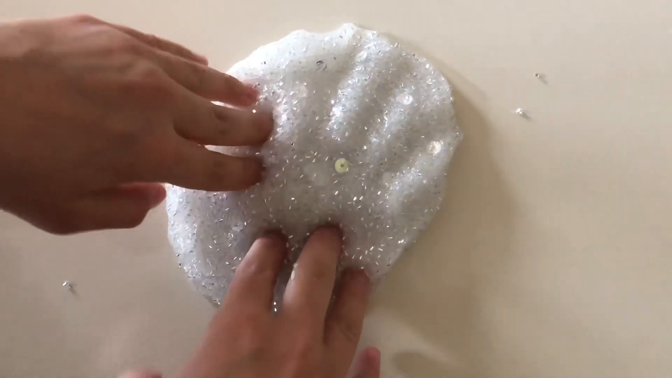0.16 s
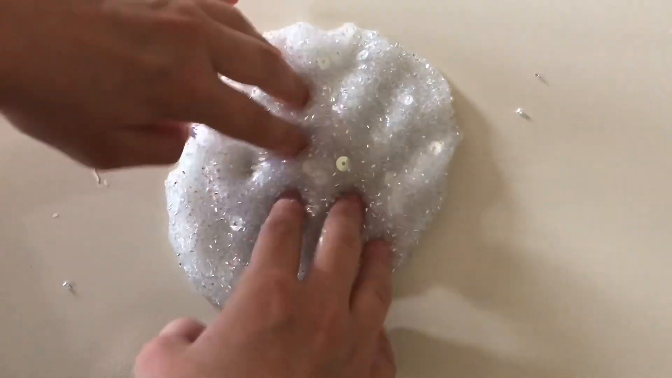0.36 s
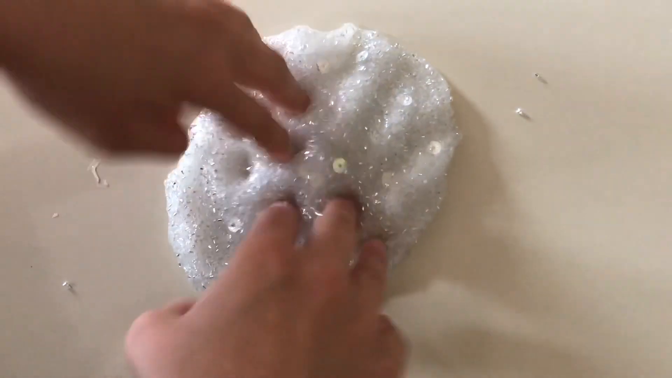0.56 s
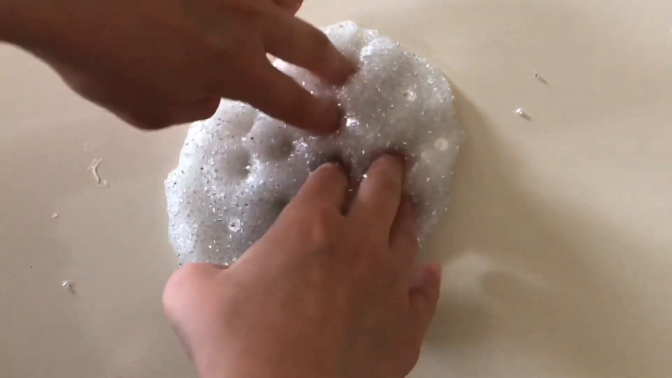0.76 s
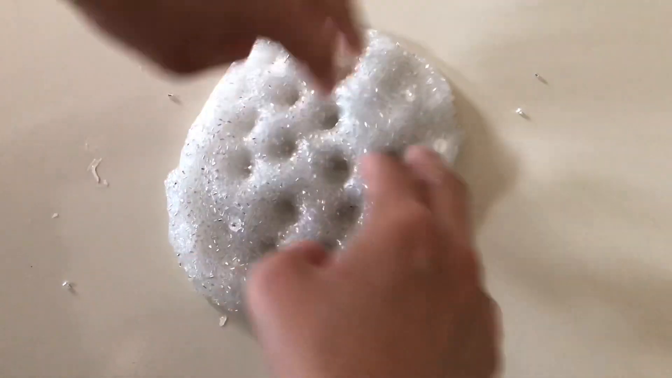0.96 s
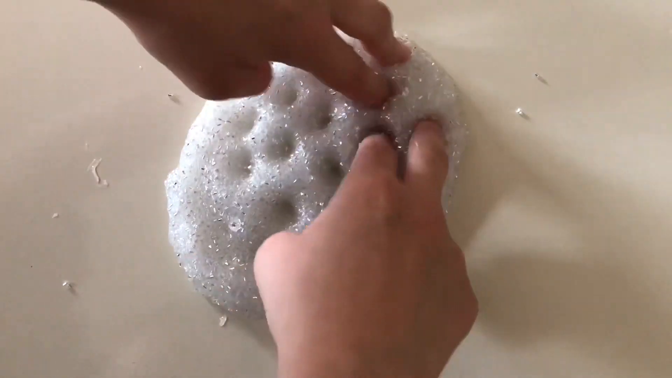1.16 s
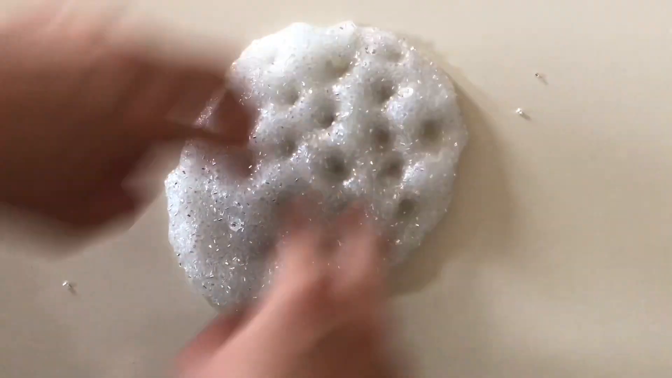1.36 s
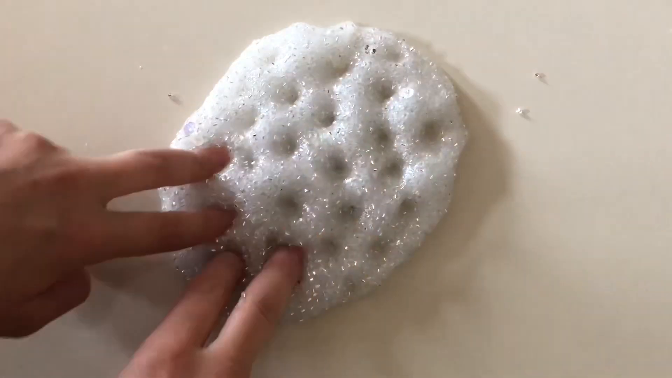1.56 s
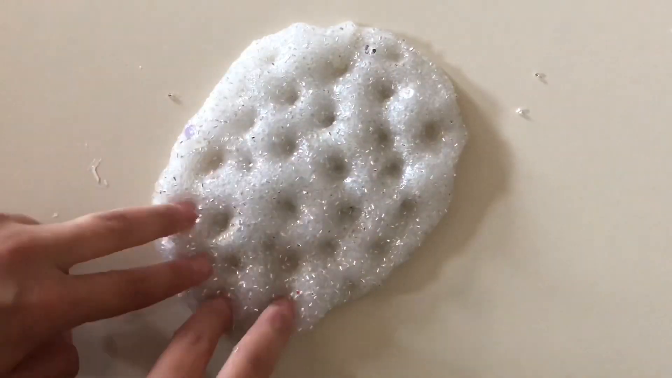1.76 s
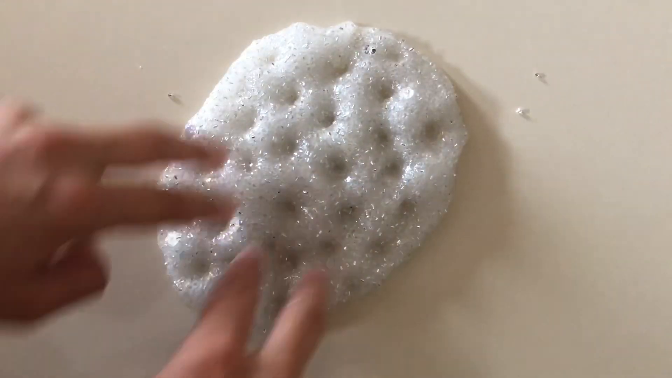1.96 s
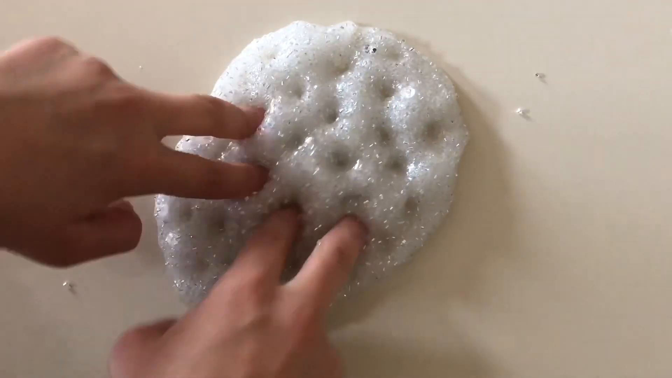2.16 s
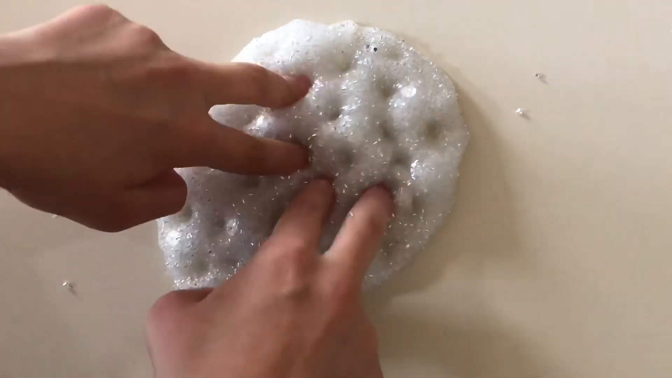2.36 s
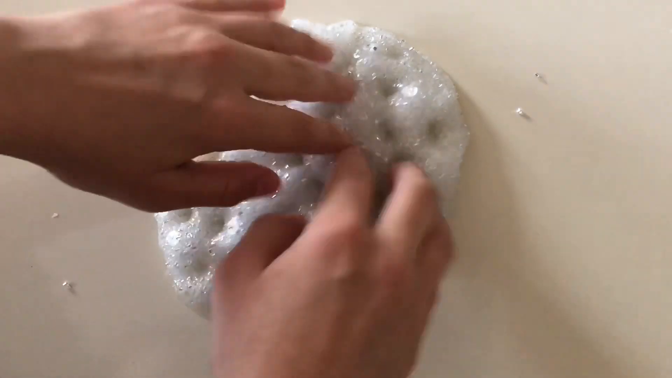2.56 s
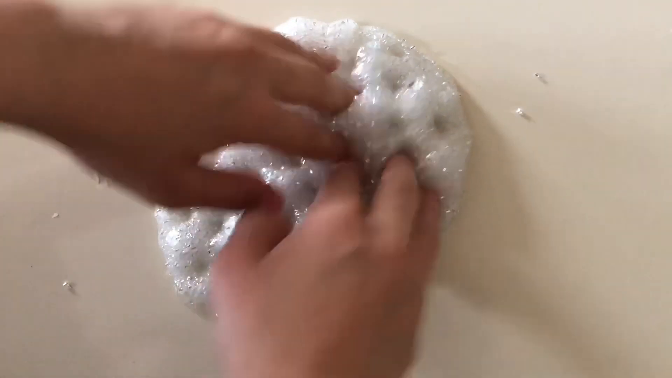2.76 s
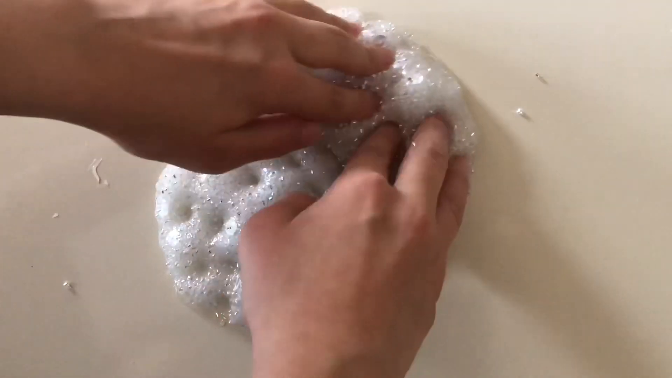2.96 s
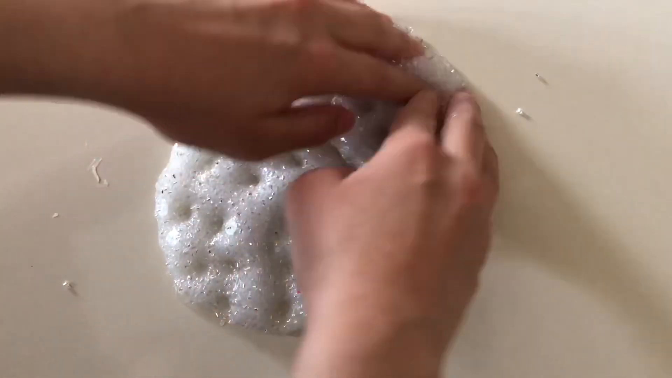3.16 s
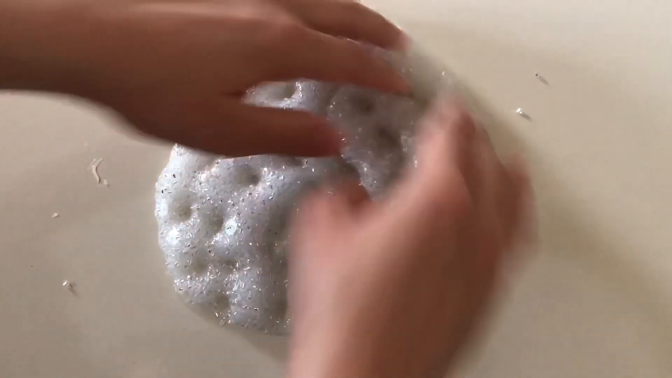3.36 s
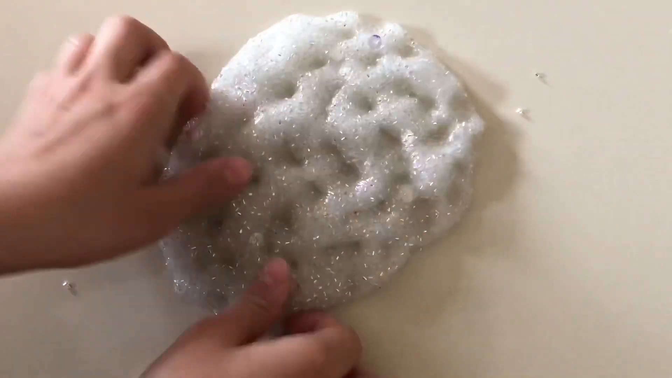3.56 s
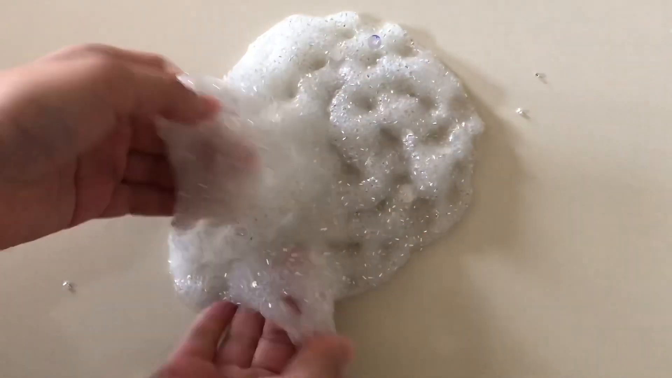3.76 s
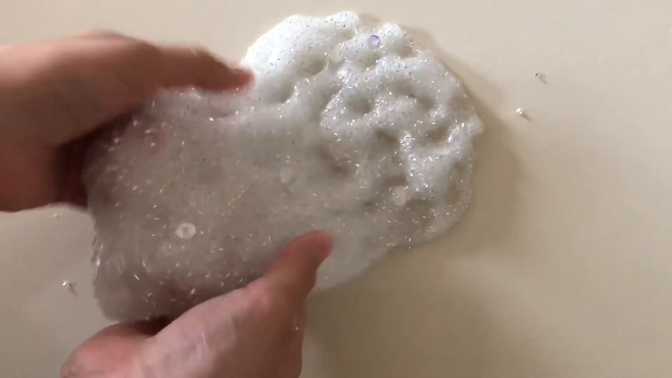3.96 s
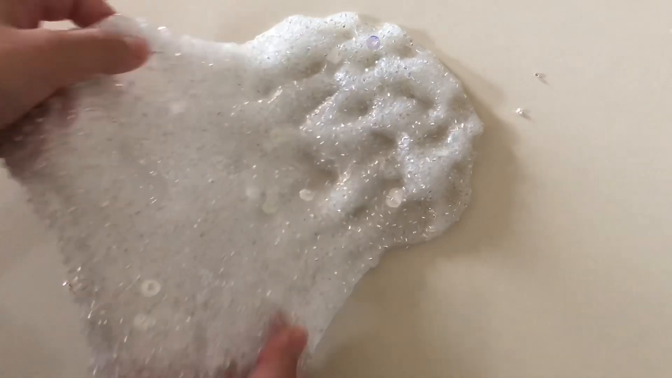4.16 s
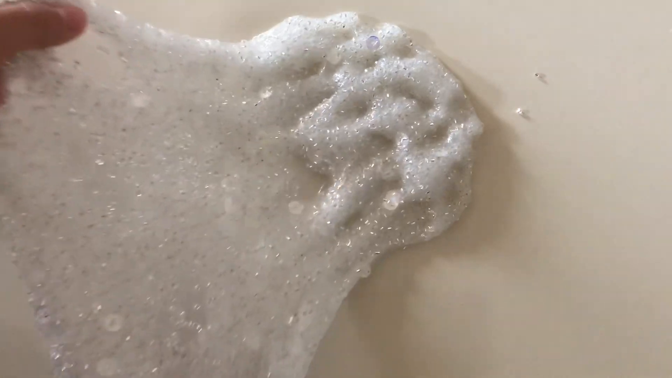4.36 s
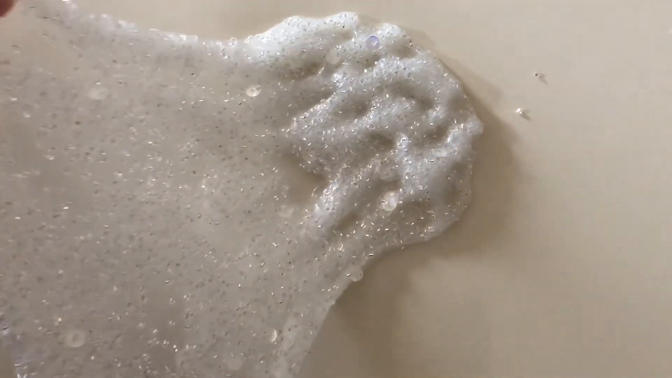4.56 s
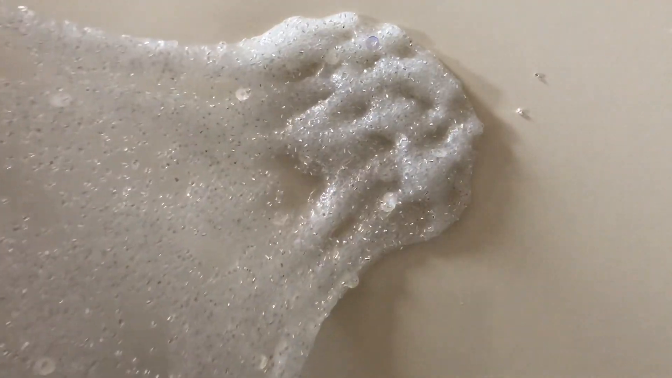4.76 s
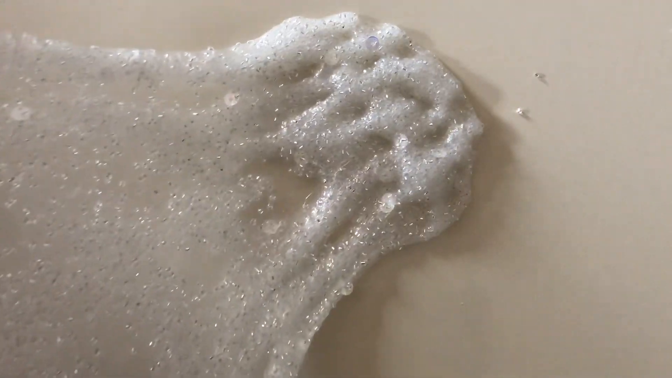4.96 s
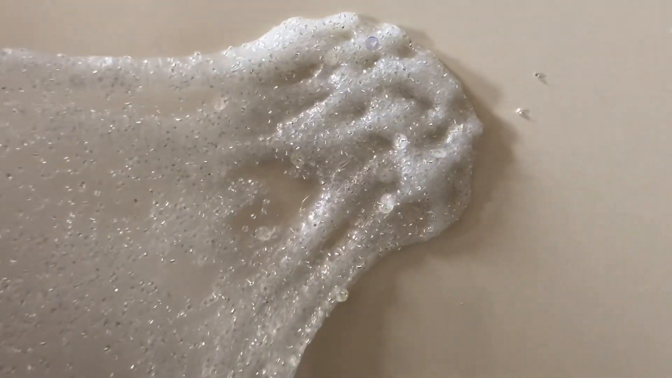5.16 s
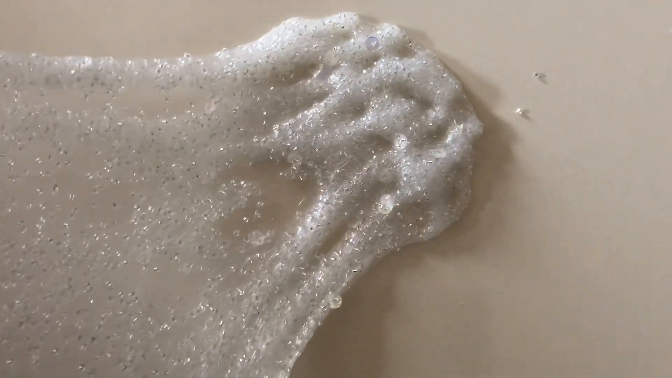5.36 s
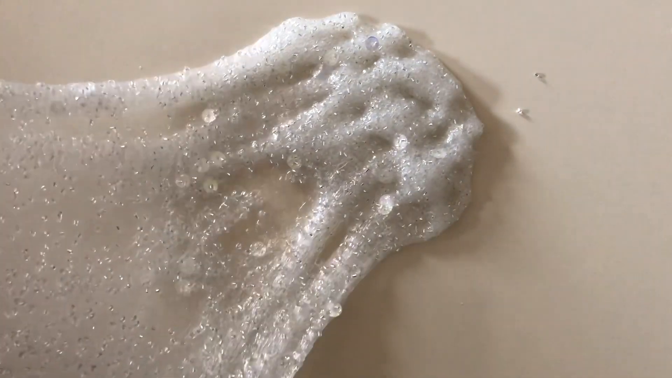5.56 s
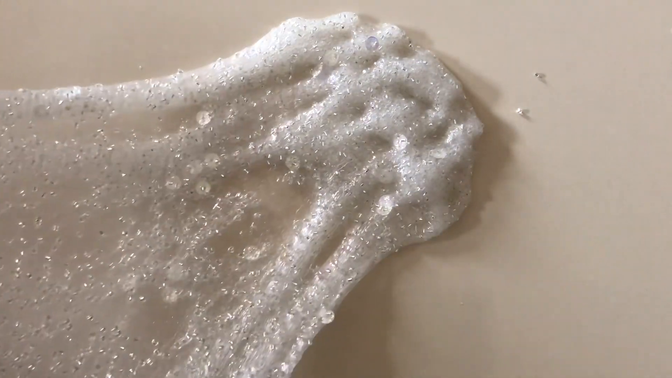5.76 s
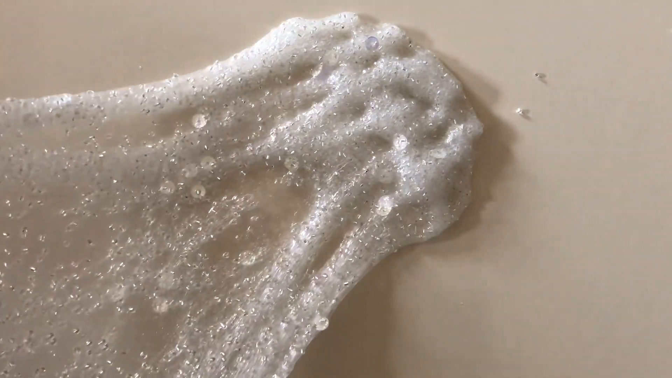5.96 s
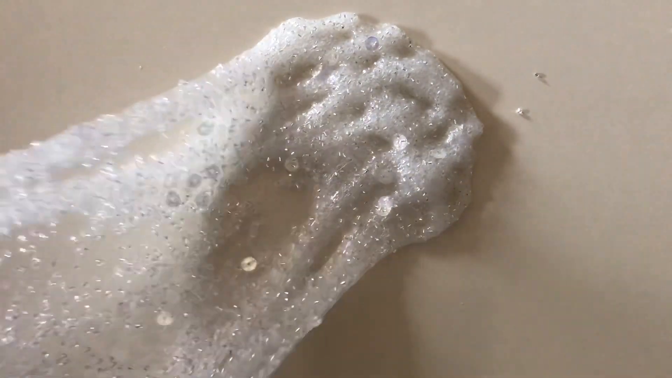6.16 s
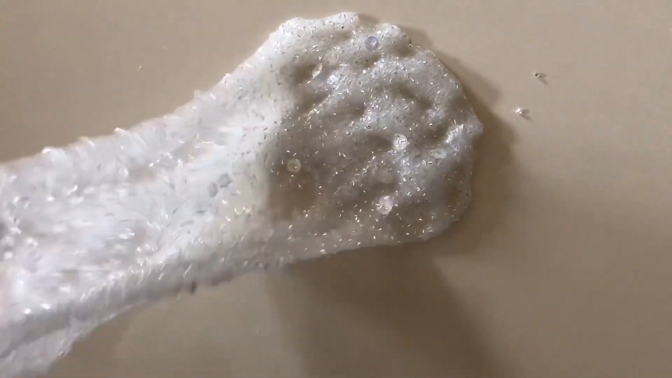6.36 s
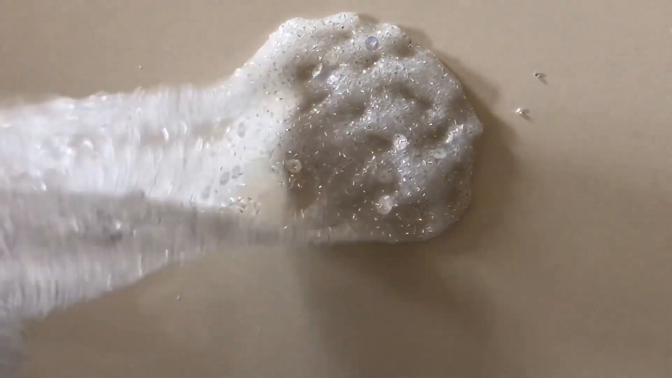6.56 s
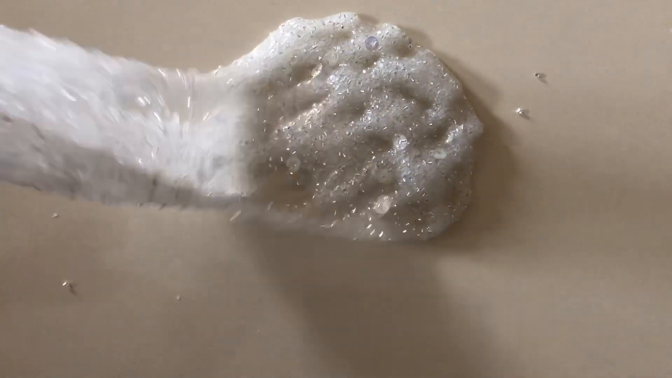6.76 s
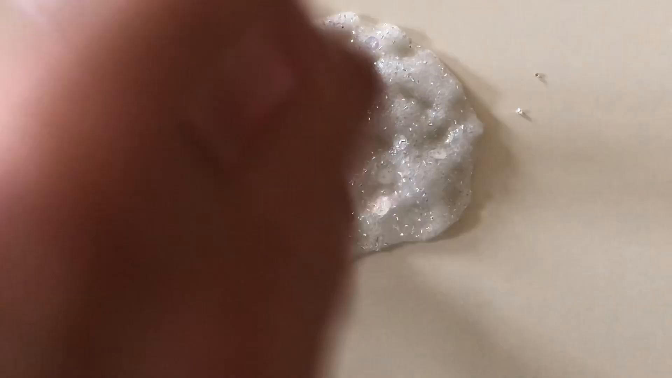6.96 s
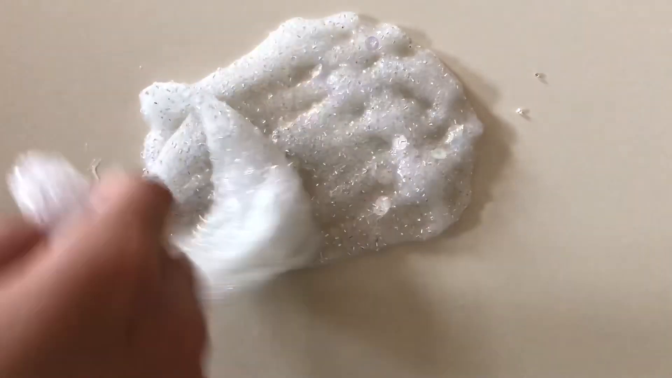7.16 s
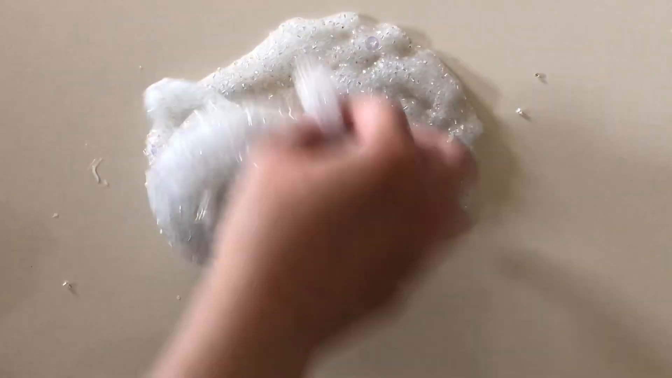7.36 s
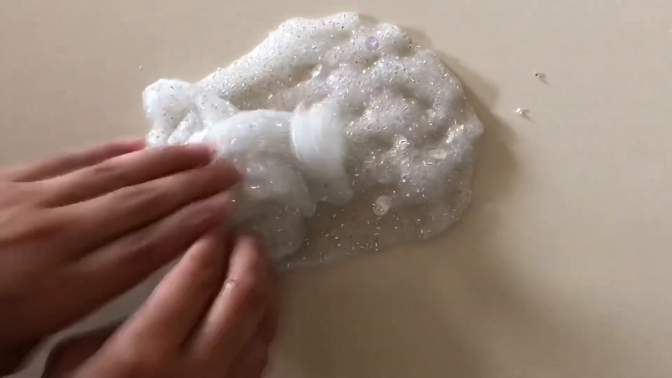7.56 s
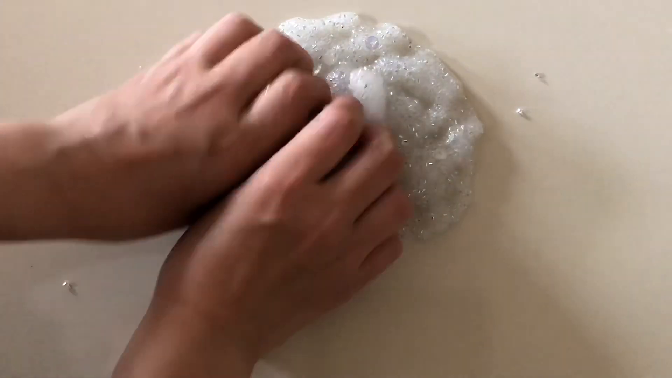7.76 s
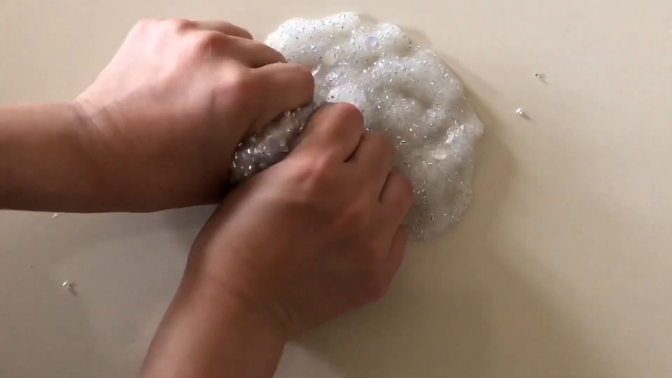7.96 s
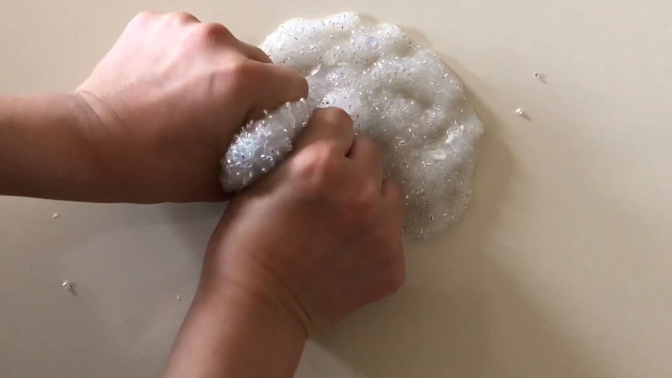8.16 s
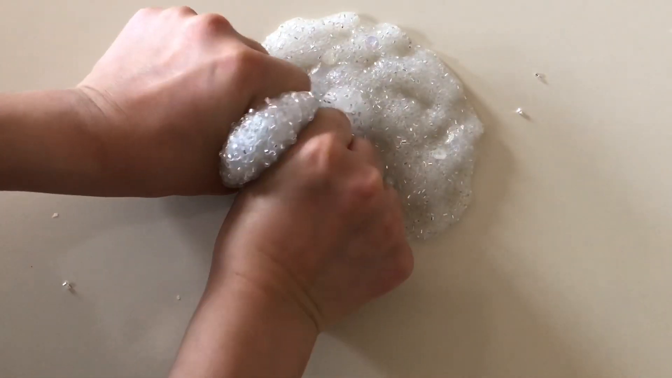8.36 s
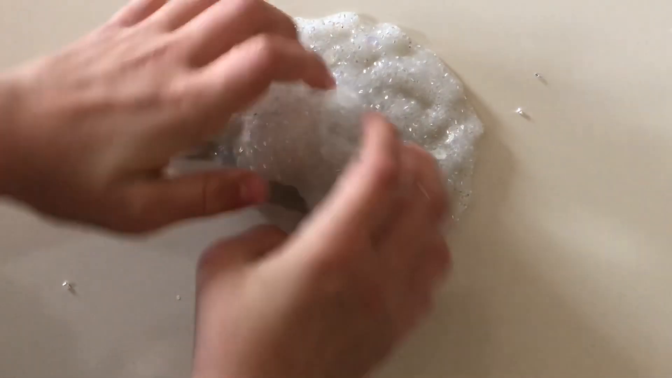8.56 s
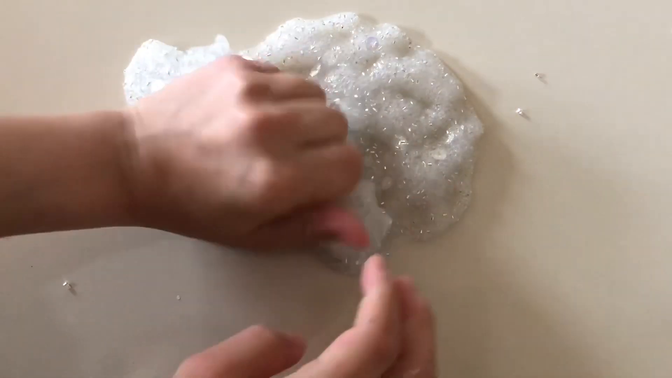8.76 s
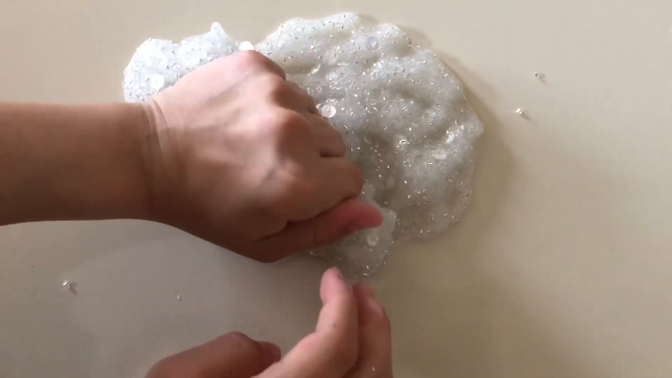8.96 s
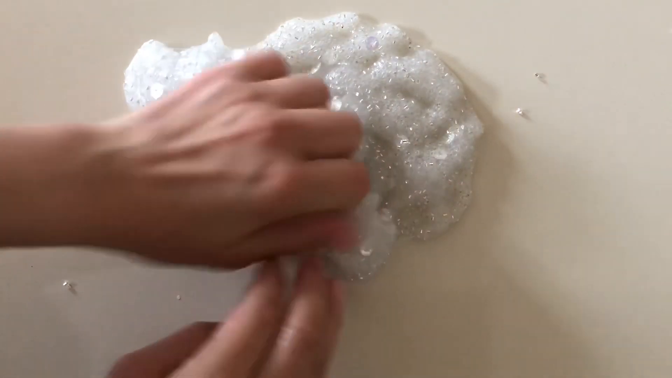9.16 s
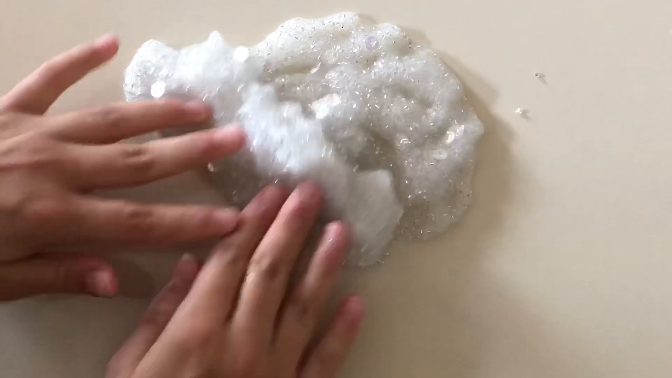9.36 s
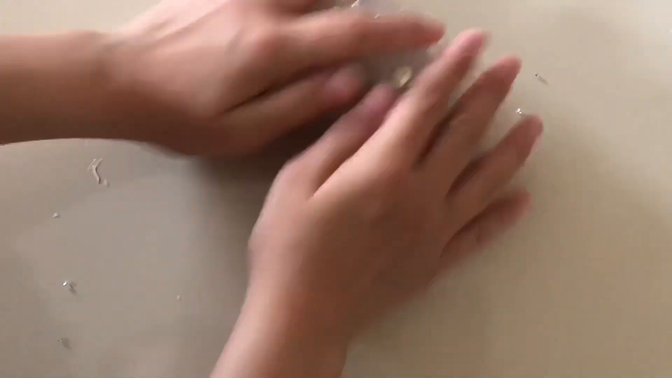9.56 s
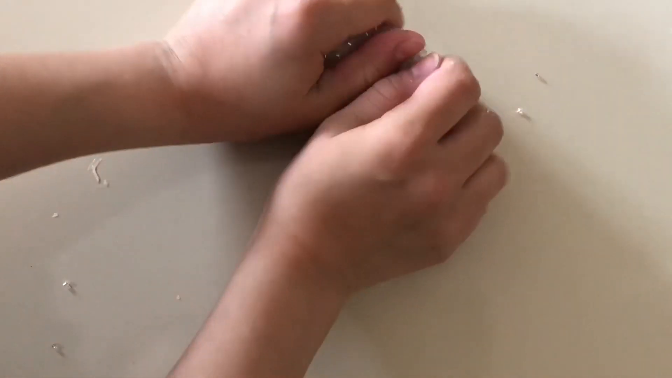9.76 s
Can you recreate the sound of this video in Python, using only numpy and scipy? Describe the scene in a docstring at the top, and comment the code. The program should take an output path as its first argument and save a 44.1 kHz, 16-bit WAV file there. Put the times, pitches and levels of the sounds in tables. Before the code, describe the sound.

Fingers poke a slab of bead-filled slime on a wooden table, each push giving a soft thump, a crunch and a small sticky click. The slime is then stretched with a faint fizz that almost dies away. Finally it is folded and squeezed, bursting into loud snaps, wet plops and crackling squelches. The microphone is close, in a quiet room with a low hum.

```python
"""Playing with bead slime

Fingers poke, stretch, fold and squeeze a slab of slime full of small beads on a wooden table.
Each poke thumps the table and crunches the beads. Trapped air pockets snap, hollows collapse with
a plop, sticky threads click as they break, and the moving slime fizzes and crackles.
The room hums quietly below, and a far motor rises in pitch for a moment."""
import sys
import numpy as np
from scipy import signal
from scipy.fft import rfft, irfft, next_fast_len
from scipy.io import wavfile

SR = 44100
rng = np.random.default_rng(int(sys.argv[2]) if len(sys.argv) > 2 else 0)


def materialize(psi):
    """Save the field psi as 16-bit PCM at rate SR to the path in sys.argv[1].

    A 1-D psi becomes a single channel; in a 2-D psi each row is a channel.
    """
    bounded = np.clip(np.atleast_2d(psi).T, -1, 1)
    quanta = np.round(bounded * 32767).astype(np.int16)
    wavfile.write(sys.argv[1], SR, quanta)


N = 433503

# Hollows in the slime collapsing. Each row: start in seconds, level in dB, starting pitch in Hz.
COLLAPSES = [(0.389, -30, 720), (0.528, -28, 2030), (0.658, -27, 2330), (1.003, -25, 1070),
             (1.0143, -22, 2320), (1.53, -27, 2500), (1.9905, -23, 2270), (3.145, -30.5, 213),
             (3.538, -28.5, 540), (3.553, -26.5, 310), (3.85, -32.5, 480), (7.733, -28, 2640),
             (7.804, -34, 1590), (7.8706, -17.5, 3000), (7.884, -21, 1800), (7.903, -5.5, 2110),
             (7.9714, -12, 3460), (8.001, -17.5, 1120), (8.015, -19, 1130), (8.089, -25.5, 1000),
             (8.155, -21.5, 1470), (8.3457, -21, 2400), (8.5655, -22, 2080), (8.579, -18.5, 2440),
             (8.856, -26, 2280), (8.884, -22.5, 2030), (8.931, -22, 2020), (8.9478, -16.5, 2210)]


def finger_pokes(rise_s, fall_s, push_s):
    """Beads crunch as a finger sinks in; the push rings the table and the hole left in the slime."""
    # Each row: start in seconds, thump level in dB, crunch level in dB, pitch of the hole in Hz.
    pokes = [(0.132, -23.5, -32, 1560), (0.272, -20, -26.5, 1800), (0.388, -27.5, -41, 1390),
             (0.539, -34.5, -45, 1850), (0.639, -22, -25.5, 1830), (1.005, -21.5, -23.5, 1490),
             (1.358, -23.5, -23.5, 1530), (1.713, -24, -29.5, 760), (1.99, -60, -26, 2060),
             (2.181, -33.5, -37, 1400), (2.27, -23.5, -29, 710), (2.538, -23, -25.5, 740),
             (2.853, -26.5, -23, 1040), (2.941, -27, -30, 890), (3.136, -30, -25, 813),
             (3.41, -27, -30, 556), (3.549, -25.5, -41.5, 1280)]
    # The notes the wooden table rings at. Each row: pitch in Hz, level in dB, seconds to fade by 60 dB.
    wood_notes = [(160, -9, 0.09), (335, 3, 0.075), (487.6, -3, 0.04), (695, -3, 0.03)]
    lag_cycles = 1.346   # deeper notes answer later
    crunch, knocks = np.zeros(N), np.zeros(N)
    t = np.arange(8000) / SR
    lead_s = 3 * rise_s
    swell = np.where(t < lead_s, np.exp((t - lead_s) / rise_s), np.exp(-(t - lead_s) / fall_s))
    pushes = rng.standard_normal((len(pokes), len(t))) * np.exp(-t / push_s) * (1 - np.exp(-t / 0.000053))
    # The hands and the slab shift the table's notes a little on every poke.
    note_gains = from_db(2.5 * rng.standard_normal((len(pokes), len(wood_notes))))
    note_tunings = np.exp(0.025 * rng.standard_normal(note_gains.shape))
    for poke, push, gains, tunings in zip(pokes, pushes, note_gains, note_tunings):
        start, thump_db, crunch_db, hole_hz = poke
        add(crunch, from_db(crunch_db) * swell, start - lead_s + 0.0027)
        thump = 0
        for gain, tuning, (hz, db, fade_s) in zip(gains, tunings, wood_notes):
            late_push = np.roll(push, round(lag_cycles * SR / hz))
            thump += gain * from_db(db) * ring(late_push, tuning * hz, fade_s)
        add(knocks, from_db(thump_db) * peak_one(thump), start)
        # The stronger the crunch, the louder the hole pops.
        hole = ring(push, hole_hz, fade_s=0.02)
        add(knocks, from_db(crunch_db + 3) * plop(1.48 * hole_hz), start + 0.003194)
        add(knocks, from_db(crunch_db - 2.5) * peak_one(hole), start + 0.00425)
    beads = crackle(per_s=1500, spread_db=3.5, band_hz=(3000, 15000), cycles=3)
    bubbles = crackle(per_s=400, spread_db=3, band_hz=(800, 4500), cycles=8)
    return crunch * (beads + from_db(-17) * bubbles) + knocks


def air_snaps(open_s, tear_s, fray_db, fray_s, ring_cycles, tear_db):
    """The skin of an air pocket tears in a burst of noise that frays out, and the pocket rings."""
    # Each row: start in seconds, level in dB, pitch of the pocket in Hz.
    pockets = [(0.138, -18.5, 2480), (0.2663, -10, 5900), (0.281, -12.5, 8800), (0.5436, -20, 3050),
               (0.6422, -8.5, 12600), (1.0132, -7.5, 6600), (1.355, -7, 12700), (1.7119, -8, 12900),
               (2.0018, -10, 1850), (2.1822, -20.5, 2870), (2.2692, -6.5, 11700), (2.528, -23, 3950),
               (2.8332, 2.5, 14500), (2.8364, -9, 3500), (2.854, -11.5, 5170), (2.942, -18.5, 5200),
               (3.408, -15, 10000), (6.599, -23, 5400), (6.707, -24.5, 4100), (6.727, -18.5, 3760),
               (6.762, -15.5, 5800), (6.874, -20.5, 8800), (7.872, -5, 6100), (7.9028, 1, 5000),
               (7.911, -9, 6400), (7.9711, 0.5, 2960), (8, 3, 6000), (8.032, -9.5, 4900),
               (8.069, -6, 10400), (8.09, 3.5, 5840), (8.154, -1, 14900), (8.2198, 1.5, 15000),
               (8.315, -7.5, 11400), (8.346, -3, 10800), (8.4086, -2.5, 16400), (8.911, -6.5, 12800),
               (8.9303, -6, 12800), (8.9469, 9, 13700), (9.807, -16.5, 10300)]
    out, t = np.zeros(N), np.arange(600) / SR
    noise = rng.standard_normal((len(pockets), 602))
    fray = from_db(fray_db + 1.8 * noise[:, :1]) * np.exp(-t / fray_s)   # some fray more than others
    tears = np.diff(noise[:, 1:]) * (1 - np.exp(-t / open_s)) * (np.exp(-t / tear_s) + fray)
    for (start, db, hz), tear in zip(pockets, tears):
        snap = peak_one(ring(tear, hz, ring_cycles / hz)) + from_db(tear_db) * tear
        add(out, from_db(db) * peak_one(snap), start - open_s)
    return out


def thread_clicks(let_go_s, plop_crack_db):
    """Sticky threads break with a dry click, some duller than others; a plop opens with one too."""
    # Each row: start in seconds, level in dB.
    threads = [(0.058, -30), (0.0694, -16), (0.1035, -22), (0.482, -19.5), (0.763, -17.5), (0.8217, -18.5),
               (1.198, -22), (1.8245, -23), (1.836, -26.5), (2.3765, -22.5), (2.419, -28), (2.7475, -14.5),
               (3.098, -24), (3.2213, -17), (3.3022, -17.5), (3.455, -8), (3.5815, -22.5), (3.69, -23),
               (4.3904, -21.5), (6.3685, -31), (6.5425, -34), (6.8395, -24), (7.7185, -18), (7.8447, -23),
               (8.1437, -14), (8.161, -4), (8.178, -14), (8.2255, -2), (8.2515, -6), (8.266, -7),
               (8.282, -25), (8.304, -23), (8.3235, -26), (8.399, -22), (8.4242, -8), (8.8532, -11),
               (8.8795, -17), (8.893, -15), (9.1025, -15.5)]
    # The deeper the plop, the fainter its crack.
    cracks = [(start, db + plop_crack_db + 10 * np.log10(hz / SR)) for start, db, hz in COLLAPSES]
    out, t = np.zeros(N), np.arange(300) / SR
    for start, db in threads + cracks:
        dullness = from_db(-2.5 + 9.9 * rng.standard_normal())
        burst = rng.standard_normal(len(t)) * (np.exp(-t / let_go_s) + 0.12 * np.exp(-t / 0.0034))
        click = np.diff(burst, prepend=0) + dullness * burst
        add(out, from_db(db) * peak_one(click), start)
    return out


def plop(hz, end_share=0.26, slide_cycles=3.82, fade_cycles=3.05):
    """A fading tone slides down toward a share of its first pitch; the lower it is, the slower."""
    cycles = hz * np.arange(3000) / SR
    slide = end_share + (1 - end_share) * np.exp(-cycles / slide_cycles)
    tone = np.sin(2 * np.pi * np.cumsum(hz * slide) / SR)
    return peak_one(tone * np.exp(-cycles / fade_cycles) * (1 - np.exp(-2 * cycles)))


def collapsing_hollows():
    """Each hollow in the slime caves in with one wet plop."""
    out = np.zeros(N)
    for start, db, hz in COLLAPSES:
        add(out, from_db(db) * plop(hz), start)
    return out


def slime_motion(rise_db_per_s=441, fall_db_per_s=302, creep_wet_db=4, creep_grain=0.9):
    """Fizz gain, squelch gain and graininess over time, as each hand move swells, holds and dies."""
    # Pulls, peels and squeezes. Each row: start and hold in seconds, fizz and squelch levels in dB,
    # graininess from 0 (air hissing out) to 1 (separate clicks).
    moves = [(3.155, 0.11, -51, -47, 0.95), (3.66, 0.23, -46.5, -43, 0.87), (3.943, 0.24, -55, -56, 0.82),
             (6.128, 0.078, -55.5, -68, 0.67), (6.323, 0.3, -50.5, -56.5, 0.88),
             (6.749, 0.009, -35.5, -46, 0), (6.837, 0.04, -46.5, -57, 0.94), (7.41, 0.11, -53, -57.5, 0.78),
             (7.716, 0.099, -43.5, -42.5, 0.89), (7.87, 0.12, -45, -32, 1), (7.963, 0.15, -25, -47, 0.92),
             (8.158, 0.25, -35, -43.5, 0.81), (8.536, 0.055, -30.5, -32.5, 0.6),
             (8.82, 0.096, -42.5, -41, 1), (8.963, 0.016, -23.5, -36, 0.46),
             (9.209, 0.054, -37, -35.5, 0.68), (9.468, 0.1, -43, -43, 0.6), (9.766, .07, -41, -38, 0.9)]
    # The slab creeps and settles all the while. Each row: time in seconds, fizz level in dB.
    creep = [(0, -59.5), (1.5, -60.5), (2.7, -55), (3.5, -57.5), (4.25, -66), (5.6, -71), (6.1, -76),
             (6.95, -63.5), (7.6, -62.5), (8.7, -63), (9.83, -53)]
    t = np.arange(0, N, 64) / SR
    start, hold, fizz_db, squelch_db, move_grain = np.transpose(moves)[:, :, None]
    shape_db = -rise_db_per_s * np.maximum(start - t, 0) - fall_db_per_s * np.maximum(t - start - hold, 0)
    move_power = from_db(fizz_db + shape_db) ** 2
    creep_power = from_db(np.interp(t, *np.transpose(creep))) ** 2
    fizz_power = np.sum(move_power, 0) + creep_power
    squelch_power = np.sum(from_db(squelch_db + shape_db) ** 2, 0) + creep_power * from_db(creep_wet_db) ** 2
    # Whatever fizzes loudest has the most say in the graininess.
    grain = (np.sum(move_grain * move_power, 0) + creep_grain * creep_power) / fizz_power
    return every_sample(t, np.sqrt(fizz_power), np.sqrt(squelch_power), np.clip(grain, 0, 1))


def kneading():
    """Many tiny films fizz over a lower, wet squelch; grainier moves come in clumps and clicks."""
    # The tone of the fizz. Each row: frequency in Hz, relative level in dB.
    fizz_tone = [(1500, -12.5), (5000, -8), (10000, -9.5), (16000, -6.5)]
    # The squelch; cupped hands ring hollow near 2 kHz. Each row: frequency in Hz, relative level in dB.
    squelch_tone = [(250, 11), (1000, 1.5), (1900, 9), (3200, -2.5), (6000, -1.5), (10000, -5)]
    fizz_gain, squelch_gain, grain = slime_motion()
    clumps_db = 4.4 * drift(hz=45)
    ticks = crackle(per_s=450 * from_db(clumps_db), spread_db=3.3, band_hz=(6000, 15000), cycles=3)
    pops = crackle(per_s=500 * from_db(clumps_db), spread_db=3.5, band_hz=(900, 5000), cycles=7)
    smooth = np.sqrt(1 - 0.82 * grain ** 2)
    fizz = smooth * coloured(rng.standard_normal(N), fizz_tone) + grain * coloured(ticks, fizz_tone)
    squelch = smooth * coloured(rng.standard_normal(N), squelch_tone) + from_db(-5.5) * grain * pops
    return from_db(0.55 * grain * clumps_db) * (fizz_gain * fizz + squelch_gain * squelch)


def bass_pops(rise_s):
    """Two very short pops that reach into the deep bass."""
    # Each row: start in seconds, level in dB.
    pops = [(7.9701, -8.5), (8.4091, -11.5)]
    out, age = np.zeros(N), np.arange(200) / SR / rise_s
    for start, db in pops:
        add(out, from_db(db) * np.e * age * np.exp(-age), start)
    return out


def room_echo(x, fade_s, wall_cut_hz):
    """Sound bounces between the walls along ten paths, quieter and duller on every round."""
    size = next_fast_len(N + SR)
    hz = np.arange(size // 2 + 1) * SR / size
    dulling = (1 / (1 + 1j * hz / wall_cut_hz)) ** 0.096
    echo = 0
    for k, lag_s in enumerate(rng.uniform(0.015, 0.022, 10)):
        delay = np.exp(-2j * np.pi * hz * round(lag_s * SR) / SR)
        one_round = from_db(-60 * lag_s / fade_s) * dulling * delay
        echo += (-1) ** k * one_round / (1 - one_round)   # all the rounds added up
    return irfft(rfft(x, size) * echo, size)[:N]


def room_hum(level_db):
    """The room's steady, low wash of noise."""
    # Each row: frequency in Hz, relative level in dB.
    hum_tone = [(30, -40), (81, -1.5), (245, -4), (364, -3), (616, -11), (1630, -20), (16000, -29.5)]
    return from_db(level_db) * coloured(rng.standard_normal(N), hum_tone)


def far_motor():
    """A low, slightly unsteady tone swells, climbs in pitch and fades."""
    # Each row: time in seconds, pitch in Hz, level in dB.
    motor_run = [(5.1, 84, -75), (5.5, 89, -58), (6.2, 108, -60), (6.7, 112, -75)]
    hz, db = every_sample(*np.transpose(motor_run))
    gain = from_db(db + 3 * drift(hz=6.5))
    return gain * np.sin(2 * np.pi * np.cumsum(hz + 4 * drift(hz=11)) / SR)


def crackle(per_s, spread_db, band_hz, cycles):
    """Random tiny clicks of very uneven size, each ringing briefly at one of ten pitches."""
    sizes = from_db(spread_db * np.minimum(rng.exponential(1, N), 5)) * rng.choice([-1, 1], N)
    clicks = sizes * (rng.random(N) < per_s / SR)
    pitch_index = rng.integers(0, 10, N)
    pitches = np.geomspace(*band_hz, 10)
    return rms_one(sum(ring(clicks * (pitch_index == k), hz, cycles / hz) for k, hz in enumerate(pitches)))


def ring(x, hz, fade_s):
    """Every click in x starts a tone that fades by 60 dB in fade_s seconds."""
    decay, step = from_db(-60 / (fade_s * SR)), 2 * np.pi * min(hz, 0.45 * SR) / SR
    return signal.lfilter([0, np.sin(step)], [1, -2 * decay * np.cos(step), decay ** 2], x + 1e-18)


def drift(hz):
    """A smooth random wobble of about size 1, mostly slower than hz."""
    decay = np.exp(-2 * np.pi * hz / SR)
    return rms_one(signal.lfilter([1], [1, -2 * decay, decay ** 2], rng.standard_normal(N + SR))[SR:])


def coloured(x, tone):
    """Shape the lows and highs of a sound with rows of (Hz, dB); the result has average level 1."""
    size = next_fast_len(N)
    hz, db = np.transpose(tone)
    bin_hz = np.arange(size // 2 + 1) * SR / size + 1
    gains = from_db(np.interp(np.log(bin_hz), np.log(hz), db))
    return rms_one(irfft(rfft(x, size) * gains, size)[:N])


def every_sample(times, *curves):
    """Join each curve's points with straight lines, one value per sample."""
    return [np.interp(np.arange(N) / SR, times, curve) for curve in curves]


def add(out, x, start_s):
    """Mix a short sound in at a given time."""
    i = max(round(start_s * SR), 0)
    out[i:i + len(x)] += x[:N - i]


def from_db(db):
    """Turn decibels into a gain."""
    return 10 ** (np.asarray(db) / 20)


def rms_one(x):
    """Scale to an average (rms) level of 1."""
    return x / np.sqrt(np.mean(x ** 2) + 1e-20)


def peak_one(x):
    """Scale to a peak of 1."""
    return x / np.max(np.abs(x))


def scene():
    """The slime and table close by, their echo, the room's hum and the motor, in one channel."""
    near = finger_pokes(rise_s=0.0066, fall_s=0.0095, push_s=0.012)
    near += air_snaps(open_s=0.00027, tear_s=0.00056, fray_db=-16, fray_s=0.0031,
                      ring_cycles=3.8, tear_db=-18.5)
    near += thread_clicks(let_go_s=0.0004, plop_crack_db=17.5) + collapsing_hollows() + kneading()
    # Everything close by loses its deep bass below about 130 Hz.
    near = signal.sosfilt(signal.butter(3, 130, "high", fs=SR, output="sos"), near)
    hum = room_hum(level_db=-54.5)
    echo = from_db(-19.5) * room_echo(near, fade_s=0.4, wall_cut_hz=160)
    return (near + echo + bass_pops(rise_s=0.0001) + hum + far_motor())[None]


def record(dry):
    """The loudest snaps clip at full scale, and the highest treble is cut away."""
    treble_cut = signal.cheby2(12, 60, 16500, fs=SR, output="sos")
    return signal.sosfilt(treble_cut, np.clip(dry, -1, 1))


dry = scene()
out = record(dry)
materialize(out)
```